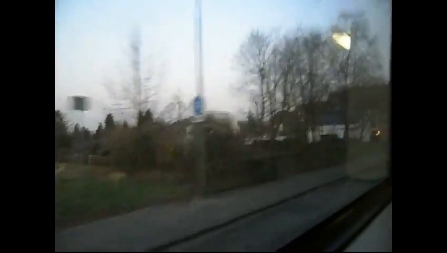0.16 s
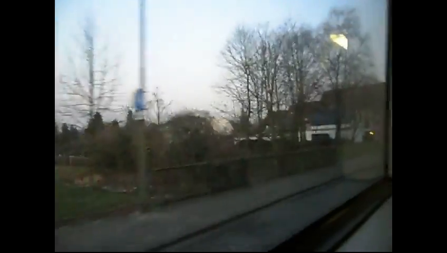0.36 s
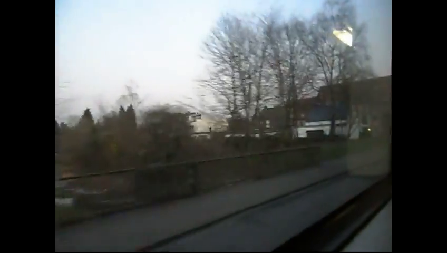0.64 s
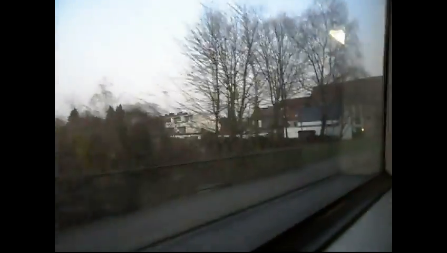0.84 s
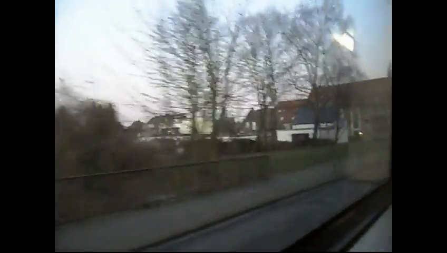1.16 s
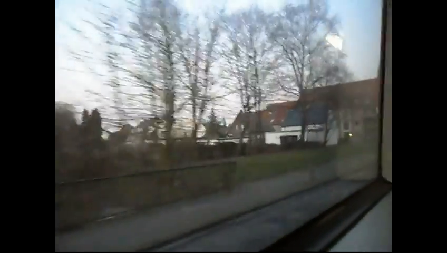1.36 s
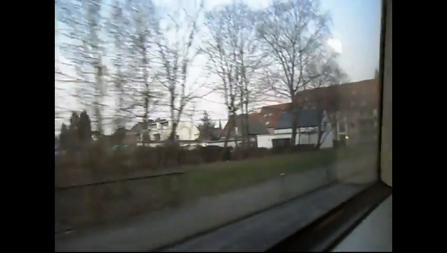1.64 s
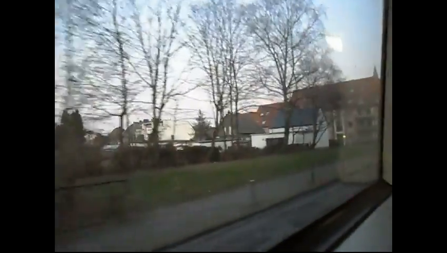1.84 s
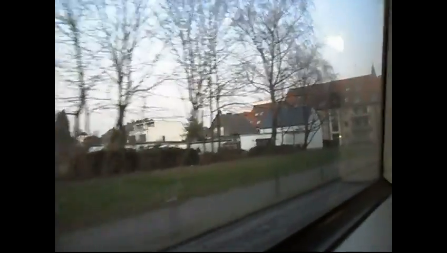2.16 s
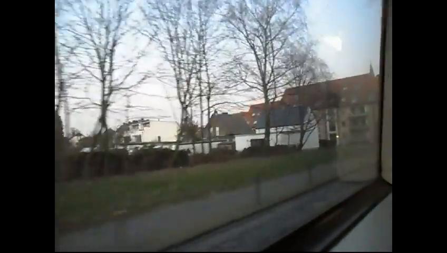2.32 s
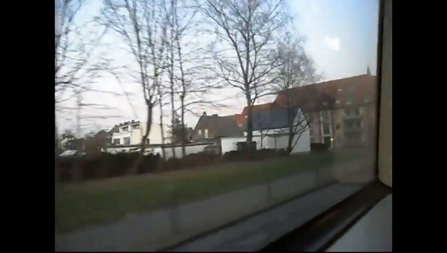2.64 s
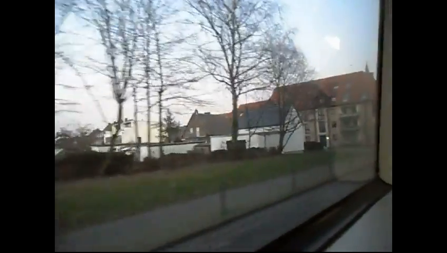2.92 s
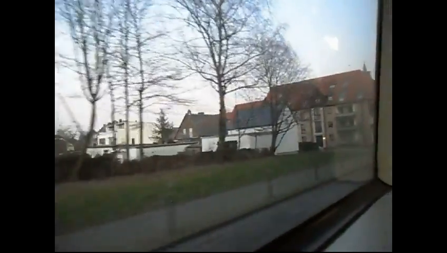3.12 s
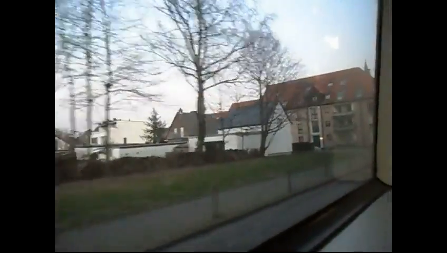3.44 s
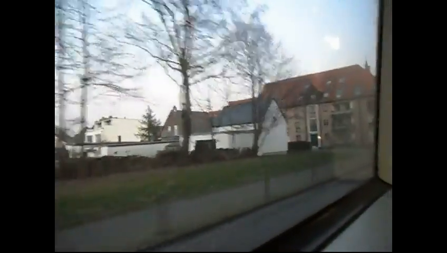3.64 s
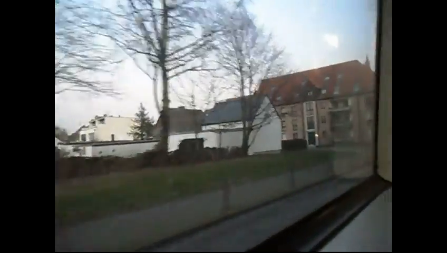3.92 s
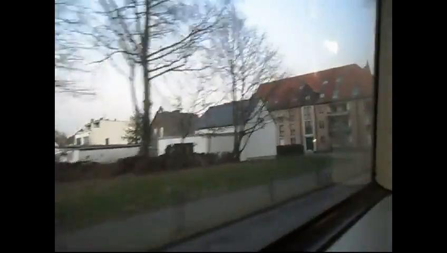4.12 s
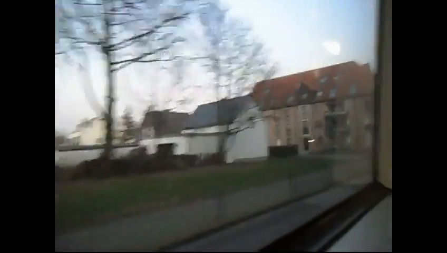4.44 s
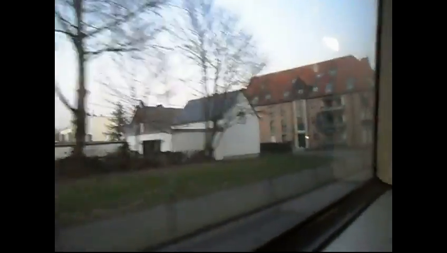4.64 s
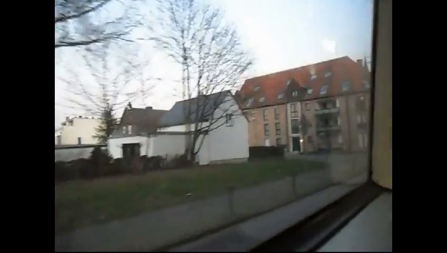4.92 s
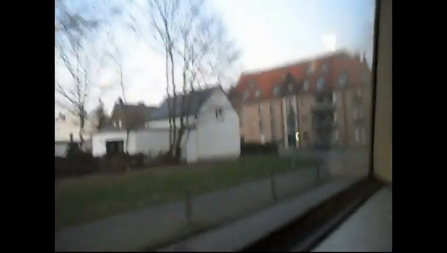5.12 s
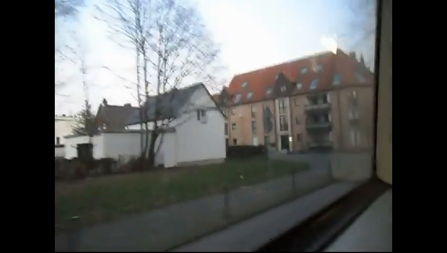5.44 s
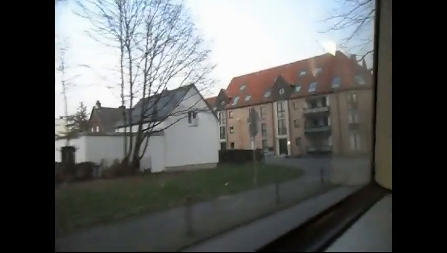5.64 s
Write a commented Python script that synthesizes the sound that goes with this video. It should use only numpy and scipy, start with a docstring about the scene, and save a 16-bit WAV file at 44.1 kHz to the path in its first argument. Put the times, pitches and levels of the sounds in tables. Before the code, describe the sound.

Inside a slowing city bus, a low engine hum and gear whine sink over dull road roar, with bumps, thumps and a late climbing drone.

```python
"""Inside a slowing city bus. From the start the engine's firing note, gear whines, a booming cabin panel, road
noise and faint whistles sound together; soon the axle hops over bumps, short clicks sound and the body thumps.
The firing note sinks, and after the big jolts the road noise and the quieter tones partly sink together and
creep back. Near the end gears and boom fade out, a low drone takes over and the firing note climbs again. Tones
are summed sines, noises are filtered, clicks are struck modes; the microphone flattens large swings."""
import sys
import numpy as np
from scipy import signal
from scipy.fft import rfft, irfft, next_fast_len
from scipy.io import wavfile

SR = 44100
rng = np.random.default_rng(int(sys.argv[2]) if len(sys.argv) > 2 else 0)


def file_out(sig):
    """Save sig as 16-bit WAV at sys.argv[1]."""
    # one column per channel
    cols = np.atleast_2d(sig).T
    # limit, then scale
    lim = np.clip(cols, -1, 1)
    pcm = np.round(lim * 32767).astype(np.int16)
    wavfile.write(sys.argv[1], SR, pcm)


N = 254898   # length in samples


def from_db(db):
    """Decibel law: amplitude is ten to the power of level over twenty."""
    return np.exp(np.asarray(db) * np.log(10) / 20)


def rms_one(x):
    """Normalisation by mean power: the rms becomes 1."""
    return x / np.sqrt(np.mean(x ** 2) + 1e-20)


def in_time(rows):
    """Linear interpolation: each column after t/s as a curve over all samples."""
    s, *columns = np.transpose(rows)
    return [np.interp(np.arange(N) / SR, s, c) for c in columns]


def after(s):
    """Linear gating: 0 before a moment, 1 after it, with a 40 ms fade centred on it."""
    return np.clip((np.arange(N) / SR - s) / .04 + .5, 0, 1)


def drift(rate):
    """Low-passed random fluctuation: two equal poles at rate (Hz), rms 1."""
    step = 40   # samples between slow values
    pole = np.exp(-2 * np.pi * rate * step / SR)
    noise = rng.standard_normal(N // step + 2002)
    slow = signal.lfilter([1], [1, -2 * pole, pole * pole], noise)[2000:]   # settled part
    return np.interp(np.arange(N) / step, np.arange(len(slow)), rms_one(slow))


def swells(rows):
    """Gaussian envelopes, summed: (t/s, height, 1/e half-length/s)."""
    out = np.zeros(N)
    for s, height, length in rows:
        first = max(round((s - 4 * length) * SR), 0)
        last = min(round((s + 4 * length) * SR), N)
        near = np.arange(first, last)
        out[near] += height * np.exp(-((near / SR - s) / length) ** 2)
    return out


def tones(hz, ratios, levels, waver_db, wander_hz):
    """Additive synthesis: sines at multiples of one frequency, each with random pitch and level drift."""
    out = 0
    for ratio, db in zip(ratios, levels):
        turns = np.cumsum(ratio * hz + wander_hz * drift(6.9)) / SR + rng.random()
        amplitude = np.sqrt(2) * from_db(db + waver_db * drift(10.0))   # level is rms
        out = out + amplitude * np.sin(2 * np.pi * turns)
    return out


# Cabin resonances in every filtered noise: f/Hz, width/Hz, lift/dB
CABIN_MODES = [(165.4, 10, 4), (430, 67, 1.5), (690, 29, 2.5), (838.4, 11, 6), (2500, 38, 1.5)]


def resonance_lift(modes, hz):
    """Resonance curves: lift in dB at hz from modes of (f/Hz, width/Hz, lift/dB)."""
    return sum(top_db / (1 + (2 * (hz - f) / width) ** 2) for f, width, top_db in modes)


def coloured(spectrum, patchy_db, shared_db):
    """Spectral shaping by spectrum and cabin; octaves flicker partly alone, partly together; rms 1."""
    size = next_fast_len(N)
    octave = np.log2(np.maximum(np.fft.rfftfreq(size, 1 / SR), 1))
    hz, db = np.transpose(spectrum)
    shape_db = np.interp(octave, np.log2(hz), db) + resonance_lift(CABIN_MODES, 2 ** octave)
    shaped = rfft(rng.standard_normal(size)) * from_db(shape_db)
    out, together_db = 0, shared_db * drift(18.0)
    for centre in range(int(np.log2(hz[0])), int(np.log2(hz[-1])) + 2):
        overlap = np.maximum(1 - np.abs(octave - centre), 0)   # neighbouring triangles sum to 1
        band = irfft(shaped * overlap, size)[:N]
        out = out + band * from_db(together_db + patchy_db * drift(5.3))
    return rms_one(out)


# Engine firing note: t/s, f/Hz, level/dB
FIRING_NOTE = [(0.0, 104.2, -26.5), (0.45, 103.8, -34), (1.1, 102.1, -23.5), (2.0, 97.7, -20.5),
               (2.56, 95.8, -16.5), (3.33, 91.8, -17), (4.35, 88.5, -21), (4.43, 87.5, -36),
               (4.55, 86.1, -29), (4.7, 85.35, -30.5), (4.86, 78.6, -22.5), (4.99, 74.9, -25),
               (5.07, 72.24, -21.5), (5.2, 69.8, -29), (5.5, 75.2, -25), (5.78, 81.2, -22.5)]
# Engine orders beside the firing note: multiple of the firing rate, level/dB at cruising level
SIDE_ORDERS = [(.5, -30), (2, -34.5)]


def engine():
    """Periodic excitation: a firing note that glides down and back up, with side orders that come and go."""
    hz, db = in_time(FIRING_NOTE)
    orders, levels = np.transpose(SIDE_ORDERS)
    sides = from_db(1.2 * sinking()) * tones(hz, orders, levels, waver_db=4.0, wander_hz=.3)
    return tones(hz, [1], [db], waver_db=0.65, wander_hz=.3) + sides


MESH_HZ, MESH_SAG_HZ_PER_S, GEARS_STOP_S = 299.2, 10.7, 4.8   # lowest mesh tone sinks evenly with road speed
# Whines: multiple of the lowest mesh tone
GEAR_RATIOS = [1.0, 1.141, 1.38, 1.997, 4.232]
# Whines away from any resonance: level/dB at cruising level
GEAR_LEVELS = [-34.5, -41.5, -45, -42.5, -61.5]
# Floor resonances that lift a whine sliding through: f/Hz, width/Hz, lift/dB
FLOOR_MODES = [(251.8, 6, 8), (264.64, 5.8, 14), (273, 1.8, 2.5), (332.5, 18, 12.5), (370.3, 24, 16),
               (504.9, 10, 10.5), (520.3, 11, 12.5), (533.3, 7.9, 5.5), (557, 14, 14), (584.6, 11, 15.5),
               (1113, 40, 17.5), (1166, 22, 13.5)]


def gears():
    """Forced resonance: whines slide down together, each swelling as it crosses a floor mode."""
    hz = MESH_HZ - MESH_SAG_HZ_PER_S * np.arange(N) / SR
    scale = np.arange(200., 1400., .5)   # Hz
    lift_db = resonance_lift(FLOOR_MODES, scale)
    levels = [db + np.interp(ratio * hz, scale, lift_db) for ratio, db in zip(GEAR_RATIOS, GEAR_LEVELS)]
    whines = tones(hz, GEAR_RATIOS, levels, waver_db=1.5, wander_hz=0.6)
    return from_db(0.9 * sinking()) * whines * (1 - after(GEARS_STOP_S))


BOOM_FLUTTER_DB, STRONG_BOOM_DB = 4.0, -14   # flutter vanishes at the strong level, is full 8 dB below
# Cabin panel boom: t/s, f/Hz, level/dB
PANEL_BOOM = [(0.0, 146, -27), (0.25, 148.1, -23), (0.6, 148.5, -30), (1.0, 149, -22), (1.4, 146, -29.5),
              (1.7, 145.4, -23), (2.45, 141.8, -22), (2.93, 147, -20), (3.27, 143.8, -17.5),
              (3.45, 144.8, -33.5), (3.61, 147, -15), (3.93, 145.1, -6.5), (4.13, 144.3, -20),
              (4.2, 142.5, -15.5), (4.49, 142.7, -33.5), (4.76, 142.8, -25), (4.99, 142.6, -26),
              (5.1, 141.4, -34)]


def boom():
    """Single-mode radiation: one panel note that flutters when weak."""
    hz, db = in_time(PANEL_BOOM)
    flutter_db = BOOM_FLUTTER_DB * np.clip((STRONG_BOOM_DB - db) / 8, 0, 1) * drift(7.2)
    note = tones(hz, [1], [db + flutter_db], waver_db=1.2, wander_hz=0.36)
    return note * (1 - after(PANEL_BOOM[-1][0]))


CRUISE_DB = -19   # roar level at which the following sounds have their own level
RUMBLE_DB, RUMBLE_FOLLOWS = -19.5, 0.16   # level at cruising; share of the roar's swing in dB
# Road noise, sinking after the big jolts and creeping back: t/s, roar level/dB, hiss level relative to roar/dB
ROAD_LEVELS = [(0.0, -18, -27.5), (0.28, -16.5, -31), (0.35, -24, -29.5), (0.75, -23, -29),
               (0.9, -19, -30.5), (1.3, -19, -29), (2.5, -18.5, -27.5), (3.4, -19.5, -27.5),
               (3.65, -18, -25.5), (3.8, -19.5, -27), (3.95, -22.5, -28.5), (4.2, -20, -30),
               (4.37, -29.5, -28), (4.4, -29, -26.5), (4.5, -34, -25.5), (4.75, -34, -25.5),
               (5.1, -24.5, -28), (5.38, -21, -28.5), (5.6, -23, -27), (5.78, -19.5, -28)]
# Brief flares of the hiss: t/s, lift/dB, 1/e half-length/s
HISS_FLARES = [(0.165, 3.5, .012), (0.255, 3.5, 0.0089), (0.28, 3, .008), (0.322, 4, .008),
               (3.5, 2.5, 0.017), (3.592, 3.5, .02), (4.135, 2, .02), (4.3, 8, 0.0082), (4.362, 7, 0.015),
               (5.351, 2.5, .04)]
# Relative noise spectra before the cabin resonances: f/Hz, level per Hz/dB
RUMBLE_SPECTRUM = [(6, -28), (10, -1.5), (18, -1.5), (26, 3), (33, -6), (45, -12), (62, -7), (80, -0.5),
                   (110, -11), (130, -16), (170, -38.5)]
ROAR_SPECTRUM = [(65, -30), (110, -9), (163, -0.5), (210, -3), (328, -12.5), (592, -10.5), (1140, -22),
                 (1500, -39), (1950, -74.5), (3300, -120)]
HISS_SPECTRUM = [(820, -30), (1400, -3.5), (1870, -10), (2290, -10), (2810, -9.5), (4100, -23.5),
                 (4850, -19), (5350, -17.5), (6210, -29.5), (7090, -26), (8310, -34), (9320, -30),
                 (11500, -47.5), (15000, -80), (22000, -120)]


def road():
    """Broadband transmission: tyre and wind noise through floor, walls and windows, in three bands."""
    roar_db, hiss_db = in_time(ROAD_LEVELS)
    rumble_gain = from_db(RUMBLE_DB + RUMBLE_FOLLOWS * sinking())
    rumble = rumble_gain * coloured(RUMBLE_SPECTRUM, patchy_db=-1.5, shared_db=2.5)
    roar = from_db(roar_db) * coloured(ROAR_SPECTRUM, patchy_db=1.03, shared_db=0.92)
    hiss_gain = from_db(roar_db + hiss_db + swells(HISS_FLARES))
    hiss = hiss_gain * coloured(HISS_SPECTRUM, patchy_db=0.7, shared_db=0.6)
    return rumble + roar + hiss


def sinking():
    """Level difference: the roar relative to its cruising level, in dB, negative when sunk."""
    return in_time(ROAD_LEVELS)[0] - CRUISE_DB


# Two thin electrical whistles: f/Hz, level/dB at cruising level
WHISTLES = [(7852, -84), (7882, -85)]


def whistle():
    """Beating: two close, fixed pitches that sink and rise with the road noise."""
    t = np.arange(N) / SR
    return sum(np.sqrt(2) * from_db(db + sinking()) * np.sin(2 * np.pi * hz * t) for hz, db in WHISTLES)


JIGGLE_HZ, JIGGLE_DB = 14.0, -23.5   # small swing between bumps, level at cruising
HOP_OCTAVE_DB = -17.5   # octave relative to the swing: lopsided, dips sharper than crests
HOP_SAG_HZ = 8.5   # a swing of size 1 is slower by this
# Road bumps: t/s, level/dB, f/Hz of a small swing, rise/s, hold/s, fall/(dB/s)
ROAD_BUMPS = [(0.152, -8, 15.2, 0.075, 0.069, 35), (0.732, -9, 15.2, 0.071, 0.044, 48),
              (1.211, -13.5, 16.4, 0.054, .05, 53), (3.619, -14, 15, 0.099, 0.056, 41.5),
              (4.161, -5, 16.8, .015, 0.268, 36), (5.017, -14, 14.6, 0.056, 0.57, 33),
              (5.087, -7, 15.7, 0.075, 0.0091, 130)]


def axle():
    """Nonlinear oscillation: each bump starts a swing that builds, holds and dies; wide swings are slower."""
    jiggle_db = JIGGLE_DB + 0.35 * sinking()
    out = tones(np.full(N, JIGGLE_HZ), [1], [jiggle_db], waver_db=3.0, wander_hz=1.505)
    for s, db, hz, rise, hold, fall_db in ROAD_BUMPS:
        start = round(s * SR)
        t = np.arange(min(N - start, 2 * SR)) / SR   # at most 2 s
        decay_db = fall_db * np.maximum(t - rise - hold, 0)
        size = np.minimum(t / rise, 1) * from_db(db - decay_db)
        phase = 2 * np.pi * np.cumsum(hz - HOP_SAG_HZ * size) / SR
        swing = np.sin(phase) + from_db(HOP_OCTAVE_DB) * np.cos(2 * phase)
        out[start:start + len(t)] += np.sqrt(2) * size * swing
    return out


TILT_PIVOT_HZ = 5000   # the tilt leaves this frequency unchanged
# Short clicks: t/s, relative level/dB, tilt/(dB per octave);
# from 4.25 to 4.67 s a run of faint overload clicks during the big swing
SHORT_CLICKS = [(0.1575, -39, -2), (1.5064, -43, 1.5), (2.5616, -40, 3), (2.6753, -42, .1),
                (3.6511, -27, 3.5), (3.877, -42, -3), (3.952, -41, -6), (4.1144, -43, 1.5),
                (4.2551, -44.5, -2), (4.2986, -41, -3), (4.3585, -45, -2), (4.4179, -43, -3),
                (4.4992, -45.5, -6), (4.5341, -49, -3), (4.6039, -49, -4), (4.6385, -49, 0),
                (4.6733, -45, -4), (5.0335, -44, .1), (5.3994, -39.5, 3)]
# Modes that colour every click: f/Hz, relative level/dB, decay by 60 dB/s
CLICK_MODES = [(1900, -0.5, .002), (3100, 4, .002), (5230, 3, 0.0032), (7100, -5, .004),
               (9200, -15.5, .003)]


def short_clicks():
    """Modal synthesis: each click is an impulse into a few quickly decaying modes."""
    s, click_db, tilt_db = np.transpose(SHORT_CLICKS)
    at, out = [round(x * SR) for x in s], np.zeros(N)
    spread_db = rng.normal(0, 1.2, (len(at), len(CLICK_MODES)))
    for k, (hz, mode_db, t60) in enumerate(CLICK_MODES):
        impulses = np.full(N, 1e-18)
        tilted_db = click_db + tilt_db * np.log2(hz / TILT_PIVOT_HZ)
        impulses[at] = from_db(tilted_db + mode_db - 5.5 + spread_db[:, k])
        r, w = from_db(-60 / (t60 * SR)), 2 * np.pi * hz / SR   # decay and turn per sample
        out += signal.lfilter([0, np.sin(w)], [1, -2 * r * np.cos(w), r * r], impulses)
    return out


# Body thumps as the wheels land: t/s, level/dB at the top of the swell, 1/e half-length/s
WHEEL_LANDINGS = [(0.178, -22.5, 0.016), (0.226, -15.5, 0.034), (0.268, -28, 0.025), (0.898, -22, 0.04),
                  (2.321, -27.5, 0.06), (4.197, -19.5, 0.023), (4.415, -33, 0.009)]
# Relative thump spectrum before the cabin resonances: f/Hz, level per Hz/dB
THUMP_SPECTRUM = [(150, -7.5), (280, 2.5), (600, -1), (900, -8), (1500, -37)]


def thumps():
    """Transient radiation: short swells of dull noise from floor and panels."""
    envelope = swells([(s, from_db(db), length) for s, db, length in WHEEL_LANDINGS])
    return envelope * coloured(THUMP_SPECTRUM, patchy_db=3.0, shared_db=1.5)


# Drone that takes over after the gear change: t/s, f/Hz of the first partial, its level/dB
DRONE_NOTE = [(5.05, 143.7, -33), (5.15, 133.2, -20), (5.22, 130.2, -31), (5.406, 126.1, -27),
              (5.63, 127.2, -17.5), (5.78, 119.5, -16.5)]
# Drone partials: multiple of the first
DRONE_RATIOS = [1.0, 2.0, 3.0, 3.55]
# Partials above the first: level/dB at cruising level
DRONE_OVERTONES = [-26.5, -33.5, -31.5]


def drone():
    """Superposition of partials: a low note whose upper partials follow the road noise."""
    hz, db = in_time(DRONE_NOTE)
    levels = [db] + [d + sinking() for d in DRONE_OVERTONES]
    return tones(hz, DRONE_RATIOS, levels, waver_db=1.5, wander_hz=0.6) * after(DRONE_NOTE[0][0])


def scene():
    """Linear superposition: all sources add in one channel."""
    tonal = engine() + gears() + boom() + whistle() + drone()
    return (tonal + road() + axle() + short_clicks() + thumps())[None]


TOP_UP, TOP_DOWN = 0.91, 0.83   # overload amplitudes of upward and downward swings
AIR_HZ, CUTOFF_HZ = 11950, 15850   # stopband edges of the microphone's top end and the last cut
FLOOR_DB = -84.5   # self-noise before the last cut


def record(dry):
    """Band limiting and saturation: the top end falls off, large swings flatten, faint self-noise joins."""
    heard = signal.sosfilt(signal.cheby2(16, 30, AIR_HZ, fs=SR, output="sos"), dry)
    top = np.where(heard > 0, TOP_UP, TOP_DOWN)
    flat = heard / (1 + np.abs(heard / top) ** 14) ** (1 / 14)
    flat = flat + from_db(FLOOR_DB) * rng.standard_normal(dry.shape)
    t = np.arange(N) / SR
    flat = flat * np.clip(np.minimum(t, t[-1] - t) / .002, 0, 1)   # 2 ms soft start and end
    return signal.sosfilt(signal.cheby2(20, 40, CUTOFF_HZ, fs=SR, output="sos"), flat)


dry = scene()
out = record(dry)
file_out(out)
```